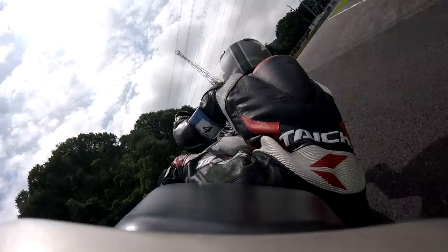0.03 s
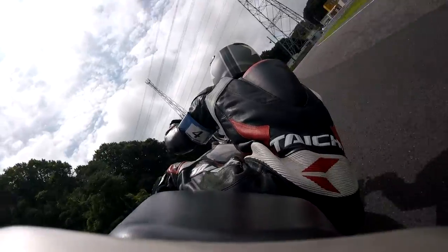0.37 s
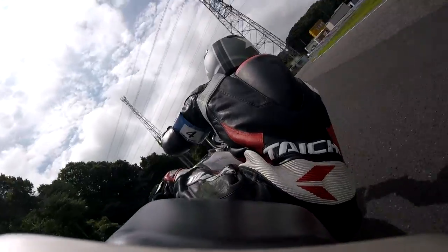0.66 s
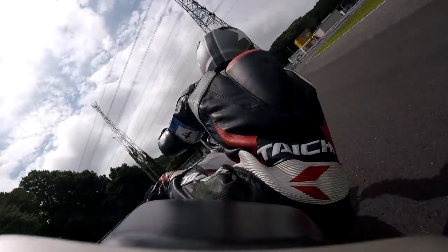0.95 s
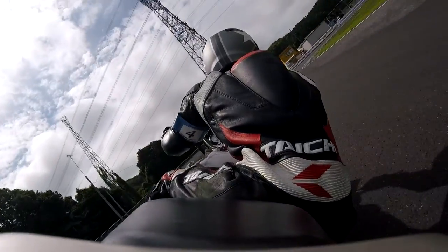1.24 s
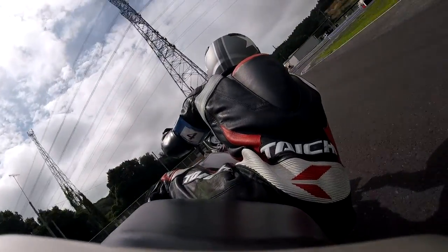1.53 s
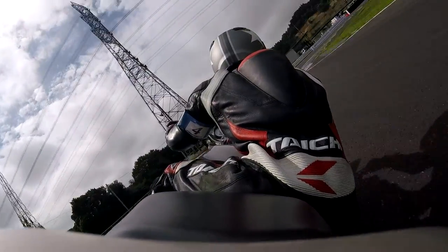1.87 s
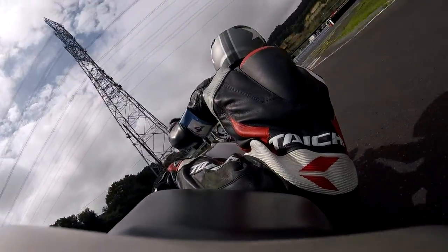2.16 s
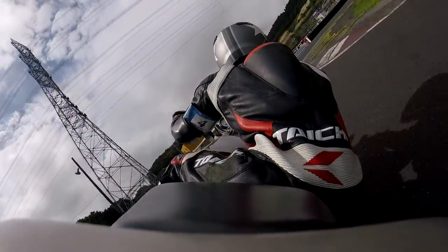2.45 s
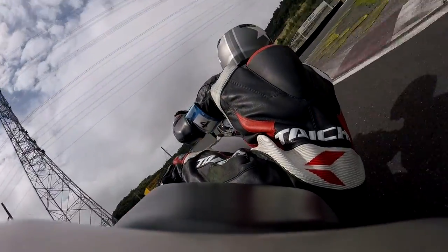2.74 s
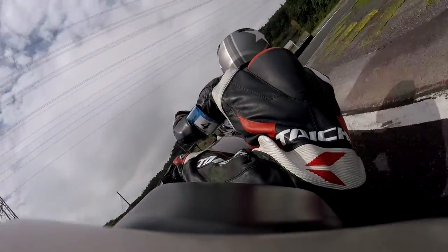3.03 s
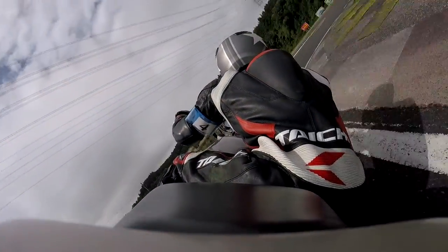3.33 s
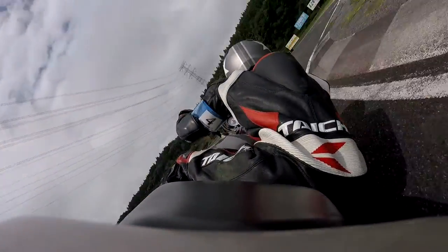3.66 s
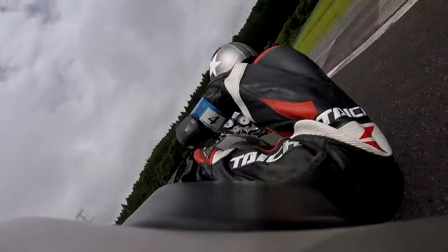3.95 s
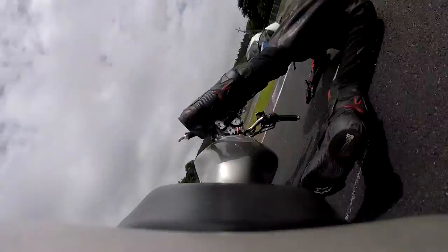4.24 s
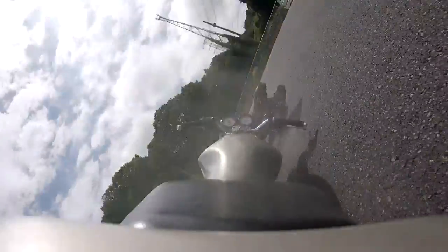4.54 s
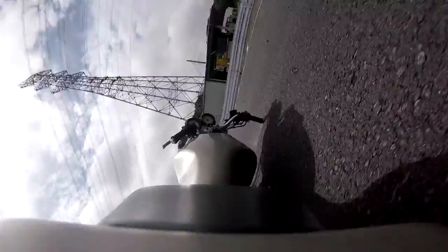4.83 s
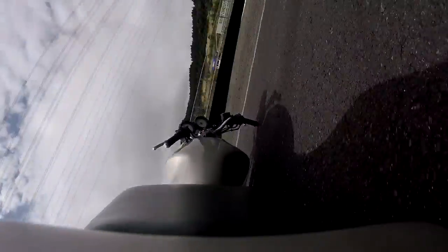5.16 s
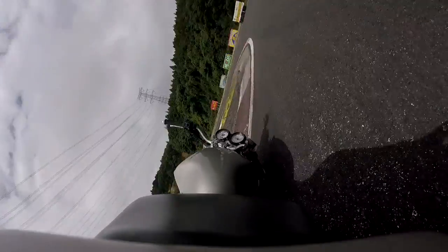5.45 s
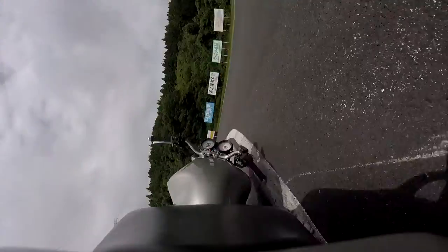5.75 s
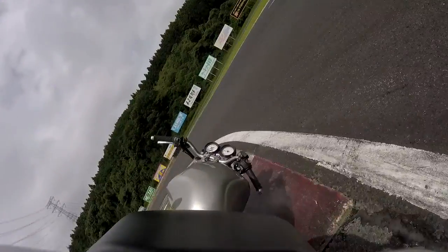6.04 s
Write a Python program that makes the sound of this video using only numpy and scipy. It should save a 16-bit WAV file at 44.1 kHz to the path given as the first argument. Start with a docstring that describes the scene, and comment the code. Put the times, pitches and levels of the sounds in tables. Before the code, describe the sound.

Heard from on board, a motorcycle drones through buffeting wind, falls, and grinds and bumps along the track as its engine dies.

```python
"""Racing motorcycle crashing in a bend

Heard from a case on its tail, a four-cylinder bike rolls off the throttle. Each firing cracks in the
exhaust, and the silencer booms as the revs fall, over wind and chassis roar. The revs rise, a footpeg
grazes the asphalt and the bike goes down. The engine dies while the bike grinds, judders and knocks
along the track, hits the kerb and slides on quietly."""
import sys
import numpy as np
from scipy import signal
from scipy.fft import rfft, irfft
from scipy.io import wavfile
from scipy.ndimage import uniform_filter1d, minimum_filter1d

SR = 44100
rng = np.random.default_rng(int(sys.argv[2]) if len(sys.argv) > 2 else 0)


def transcribe(signal):
    """Save signal, clipped to [-1, 1], as a 16-bit WAV file at the path in sys.argv[1]."""
    frames = np.atleast_2d(signal).T
    limited = np.clip(frames, -1, 1)
    pcm = np.round(limited * 32767).astype(np.int16)
    wavfile.write(sys.argv[1], SR, pcm)


N = 277389
TIME = np.arange(N) / SR
CRUISE_HZ = 330  # reference firing rate for the levels that follow the revs

# the four firings of a cycle: strength/dB, lateness/share of the firing gap
CYLINDERS = [(1.5, 0.0028), (2, 0.014), (0, -0.0046), (0.5, .005)]
# engine load, with the throttle snapped shut before the bend: t/s, level/dB
LOAD = [(0, 0), (.715, 2), (.745, -10), (.9, -1.5), (2.3, -0.5), (2.6, -10), (3.25, -6.5), (3.5, 5.5),
        (3.85, -4), (4.3, -4.5)]


def revs(flare_s=3.497, flare_length_s=.026, flare_hz=17):
    """Firings per second, with a brief flare as the rear tyre slips on the painted line."""
    firing_rate = [(0.0, 323.8), (0.22, 329), (0.35, 336), (0.52, 346.8), (0.64, 347.3), (0.725, 350),
                   (0.8, 319.5), (0.88, 327.8), (1.0, 326.3), (1.2, 317.7), (1.4, 305), (1.62, 288.3),
                   (1.85, 277), (2.0, 267.4), (2.35, 252.3), (2.9, 235.8), (3.42, 221), (3.66, 239),
                   (3.9, 263), (4.17, 301.5), (4.4, 266), (4.52, 222), (4.75, 180)]  # engine speed: t/s, f/Hz
    return curve(firing_rate) + flare_hz * np.exp(-((TIME - flare_s) / flare_length_s) ** 2)


def shaft():
    """The slightly unsteady shaft's position, counted in firings."""
    return np.cumsum(revs() * (1 + .0012 * wander(hz=32.4))) / SR


def running(stall_s=4.814, fade_s=0.53):
    """1 while the bike runs, fading to 0 as it stalls."""
    return 1 - ramp(stall_s - fade_s, fade_s)


def engine(firings, lope_db=-2, cycle_db=-11, whine_db=-74, casing_hz=6750, casing_width_hz=450):
    """Exhaust cracks, the low orders of silencer and crank, and gear whine, all on one shaft."""
    bark, crank, boom, octave, twelfth = engine_levels()
    cycle = firings / len(CYLINDERS)
    # the silencer's overtones throb once a cycle and flutter from firing to firing
    throb = unit(amp(wander(hz=91) - np.cos(2 * np.pi * cycle)))
    overtones = octave * tone(firings, order=2, waver_db=2.2)
    overtones += twelfth * tone(firings, order=3, waver_db=2.4)
    pipe = boom * tone(firings, order=1, waver_db=1.36) + throb * overtones
    # unequal cylinders add orders of the whole cycle, stronger under load
    lope = amp(lope_db) * tone(cycle, order=3, waver_db=4.0)
    lope += amp(cycle_db) * tone(cycle, order=1, waver_db=1.5)
    shake = crank * tone(cycle, order=2, waver_db=3.0) + bark ** 0.65 * lope
    # the gears sing only where their mesh rate meets a resonance of the casing
    mesh_hz = 30 * np.gradient(firings) * SR  # 30 teeth per firing
    casing = amp(whine_db) / (1 + ((mesh_hz - casing_hz) / casing_width_hz) ** 2)
    whine = casing * ringing(mesh_hz, width_hz=80)
    return exhaust(firings, bark) + pipe + shake + whine


def engine_levels(bark_db=-25, bark_db_per_hz=0.24, overtone_db_per_hz=0.19,
                  fall_s=3.9, fall_db=-4, dying_db_per_s=-13):
    """Gains of bark, crank shake, boom, octave and twelfth, shaped by revs, load and throttle."""
    crank = [(0, -11), (.3, -21), (.55, -11), (.72, -12), (.9, -16), (1.3, -23.5), (1.5, -15.5),
             (2.55, -26), (3.9, -22)]  # crank shake: t/s, level/dB
    throttle = [(0, 0.5, -5.5), (.74, -2, 2), (3.42, -7, -5.5)]  # voicing when open, shut, open again: from t/s, octave/dB, twelfth/dB
    hz, load_db = revs(), curve(LOAD)
    bark = amp(bark_db + bark_db_per_hz * (hz - CRUISE_HZ) + load_db)
    # as the bike goes down the silencer's note ducks, then dies away
    fallen = amp(fall_db * ramp(fall_s, 0.15) + dying_db_per_s * np.maximum(TIME - fall_s, 0))
    boom = fallen * amp(0.035 * load_db) * silencer(hz)
    since, *voicing_db = np.transpose(throttle)
    setting = np.searchsorted(since[1:], TIME)
    drive = fallen * amp(overtone_db_per_hz * (hz - CRUISE_HZ) + 0.17 * load_db)
    overtones = [drive * amp(uniform_filter1d(db[setting], size=1500)) * silencer(order * hz)
                 for order, db in enumerate(voicing_db, 2)]
    return running() * np.array([bark, amp(curve(crank)), boom, *overtones])


def exhaust(firings, bark, uneven_db=.5, rasp_db=-2, spit_db=7, overrun=1.2, jitter=.0024, puff=0.36):
    """A sharp crack and a puff of gas per firing; off the throttle the cylinders differ more."""
    pipe_eq = [(350, -39), (600, -20.5), (800, -5), (1050, -7.5), (1350, 1), (1700, -1.5), (2080, 2),
               (2400, 2), (2800, -10), (3400, -18), (4600, -28.5), (7000, -34), (9000, -55.5),
               (12000, -66.5)]  # colour of one crack: f/Hz, level/dB
    firing = np.arange(1, int(firings[-1]) - 1)
    strength_db, late = np.array(CYLINDERS)[firing % len(CYLINDERS)].T
    timing, size = rng.standard_normal((len(firing), 2)).T
    ragged = 1 + overrun / (1 + (np.interp(firing, firings, bark) / amp(-22.0)) ** 2)
    when = firing + ragged * late + jitter * timing  # jitter and puff are shares of the firing gap
    cracks = pulses(firings, when, amp(ragged * strength_db + uneven_db * size))
    # the gas hisses far above the cracks, and one cylinder spits hardest
    spit = amp(spit_db * (firings % len(CYLINDERS) < 1))
    puffs = spit * np.exp(-(firings % 1) / puff) * rng.standard_normal(N)
    hiss = np.diff(np.diff(puffs, prepend=0), prepend=0)
    return bark * unit(colour(cracks + amp(rasp_db) * unit(hiss), pipe_eq))


def silencer(hz):
    """Gain of an engine order as it sweeps through the silencer's resonances."""
    resonances = [(243.4, 34, -6), (312, 50, -15.5), (497, 16, -9.5), (546, 13, -19), (655, 30, -25.5),
                  (745, 14, -19), (826, 23, -23.5), (958, 36, -23)]  # f/Hz, half width/Hz, level/dB
    return sum(amp(db) / (1 + ((hz - centre) / width) ** 2) for centre, width, db in resonances)


def knocks(rise_s=.0045, rattle_db=-19, rattle_s=0.041, detune=0.043, debris_db=-6.5):
    """Each blow crushes plastic and grit for a moment and sets the tail unit ringing."""
    # blows to the bike: t/s, thud/dB, crunch/dB and grit/dB (both before debris_db), crush length/s
    blows = [(1.658, -20.5, -9, -55.5, 0.0036), (4.251, -5.5, -13, -43, 0.014),
             (4.309, -13, -7, -62, 0.017), (4.326, -4, -16, -50, 0.0091), (4.363, -24, -19, -34.5, 0.0065),
             (4.458, -4, -3, -36, 0.019), (4.505, -5, -13.5, -46.5, 0.021), (4.622, -12, -20, -71, .005),
             (4.735, -2.5, -19, -50, 0.026), (4.769, -6, -14, -46, 0.01), (4.864, -6, -7, -46, 0.011),
             (4.944, -10, -18, -48, 0.02), (5.134, -10.5, -19, -61, .006), (5.251, -20, -22, -58, .004),
             (5.371, -8, -24.5, -44.5, 0.01), (5.55, -15, -29, -57, 0.0041),
             (5.616, -1.5, -17, -49, 0.0042), (5.666, -5, -17, -44, 0.0074), (5.758, -4.5, -14, -54, 0.016),
             (5.795, -3, -1, -32.5, .008), (5.868, -11, -22, -58, .013), (5.968, -1.5, 3.5, -32, 0.0091),
             (5.979, -7, -12, -31.5, 0.0034)]
    modes = [(126.4, 2, 0.21), (193.5, 7, 0.092), (234.3, 8, 0.14), (275.6, -15, 0.39), (395.6, -8, .15),
             (651, -19.5, 0.24), (727, -10.5, 0.15), (970, -50, .2), (1260, -44.5, .2), (1560, -31, 0.13)]  # tail unit and case: f/Hz, level/dB, t60/s
    crunch_eq = [(150, 8), (450, 0), (650, 1.5), (900, 0), (1400, -7.5), (1900, -20), (3000, -31),
                 (4500, -41.5), (7000, -39.5), (9500, -46), (12000, -65.5)]  # crushed plastic: f/Hz, level/dB
    grit_eq = [(1500, -22.5), (3200, 12), (4500, 1), (6800, 6.5), (8400, -6.5), (9800, -10.5), (12000, -20)]  # bright chips of grit: f/Hz, level/dB
    thuds, crush, grit = np.zeros((3, N))
    hz, mode_db, t60 = np.transpose(modes)[:, :, None]
    t = np.arange(SR // 2) / SR
    decays = amp(mode_db) * np.exp(-np.log(1000) * t / t60)
    for s, thud_db, crunch_db, grit_db, length in blows:
        struck_hz = hz * (1 + detune * rng.standard_normal(hz.shape))
        ring = (decays * np.sin(2 * np.pi * struck_hz * t)).sum(0)
        ring *= 1 - np.exp(-(t / 0.0019) ** 2)  # the plastic gives, so the ring starts softly
        add(thuds, s, amp(thud_db) * ring / abs(ring).max())
        # the contact builds up, lets go, and loose parts rattle on
        before, after = np.maximum(s - TIME, 0), np.maximum(TIME - s, 0)
        rattle = amp(rattle_db) * np.exp(-after / rattle_s)
        force = np.exp(-before / rise_s) * (np.exp(-(after / length) ** 2 / 2) + rattle)
        crush += amp(crunch_db) * force
        grit += amp(grit_db) * force
    crunch = crush * unit(colour(grains(per_s=5000, spread_db=4.5), crunch_eq))
    chips = grit * unit(colour(grains(per_s=7000, spread_db=0.5), grit_eq))
    return thuds + amp(debris_db) * (crunch + chips)


def slide():
    """The frame rumbles and the asphalt grinds in uneven slips, hardest once the bike is down."""
    scrubs = [(3.22, .22, -18, -34), (3.5, 0.56, -23, -29.5)]  # tyres over kerb and painted line: t/s, hold/s, rumble/dB, grind/dB
    skids = [(4.076, 0.3, -16.5, -23), (4.448, 0.16, -11.5, -27), (4.702, 0.19, -12, -24.5),
             (4.924, 0.29, -17, -25), (5.275, .19, -16, -25.5), (5.57, .25, -12, -25.5),
             (5.865, .01, -27, -33.5)]  # on its side between bounces: t/s, hold/s, rumble/dB, grind/dB
    rumble_eq = [(12, -9.5), (25, -0.5), (55, 1), (100, 0.5), (170, -7), (230, -6.5), (310, -16.5),
                 (480, -34.5), (1200, -67)]  # the frame's low end: f/Hz, level/dB
    grind_eq = [(150, 2.5), (230, 6), (350, 0), (520, -7), (720, 2), (850, 3.5), (1000, -3), (1300, -10),
                (1800, -24.5), (2500, -27.5), (3800, -39), (7200, -38.5), (9000, -52.5), (12000, -64)]  # grinding asphalt: f/Hz, level/dB
    rumble, grind = strokes(scrubs + skids, attack_s=0.071, release_db_per_s=150)
    frame = unit(colour(rng.standard_normal(N), rumble_eq))
    slips = amp(1.52 * wander(hz=45))
    stones = unit(colour(grains(per_s=9800, spread_db=1.0) * slips, grind_eq))
    return rumble * frame + grind * stones


def judders():
    """Short bursts of stick and slip shake the whole frame."""
    bursts = [(4.442, 0.14, 229.6, 208, -11), (4.686, 0.078, 96, 77, -12), (4.841, 0.061, 70, 57.7, -7),
              (4.969, 0.22, 130, 105.2, -16), (5.108, 0.12, 67, 61.6, -10.5), (5.337, 0.097, 105, 114, -18),
              (5.445, 0.1, 67.6, 50.8, -7), (5.576, 0.084, 52.8, 64.6, -9)]  # low gliding shudders: t/s, length/s, start f/Hz, end f/Hz, level/dB
    out = np.zeros(N)
    for s, length, start_hz, end_hz, db in bursts:
        hz = np.linspace(start_hz, end_hz, int(length * SR))
        swell = amp(db) * signal.windows.tukey(len(hz), .7)
        add(out, s, swell * np.sin(2 * np.pi * np.cumsum(hz) / SR))
    return out


def footpeg(attack_s=0.043, release_db_per_s=470):
    """Metal chatters over the stones and squeals in short bursts."""
    scrapes = [(3.695, 0.029, -28), (4.055, 0.22, -24.5), (4.28, 0.085, -32.5), (4.46, 0.014, -35.5)]  # peg and fairing on the asphalt: t/s, hold/s, level/dB
    squeals = [(3.703, .008, -45), (4.11, .135, -36)]  # the peg sings out: t/s, hold/s, level/dB
    scrape_eq = [(400, -22), (850, 12.5), (1150, 0.5), (1500, 5), (1900, -4.5), (2800, -6.5), (3200, -4),
                 (3700, -13), (5200, -18), (7200, -31.5), (9000, -41), (12000, -56.5)]  # scraping metal: f/Hz, level/dB
    modes = [(3220, 41, -6.5), (4850, 90, -22)]  # the peg's resonances: f/Hz, width/Hz, level/dB
    chatter = grains(per_s=6500, spread_db=0.5) * amp(1.3 * wander(hz=70))
    rings = sum(amp(db) * ringing(hz, width_hz) for hz, width_hz, db in modes)
    scrape = strokes(scrapes, attack_s, release_db_per_s)[0] * unit(colour(chatter, scrape_eq))
    squeal = strokes(squeals, attack_s, release_db_per_s)[0] * unit(rings)
    return scrape + squeal


def groan():
    """A frame slider's rough note rises and sinks on the asphalt as the bike turns on its side."""
    contour = [(4.902, 745, -30), (5.021, 815.6, -32), (5.141, 866, -27.5), (5.279, 777, -41),
               (5.42, 753, -46), (5.52, 698, -42)]  # the slider's note: t/s, f/Hz, level/dB
    s, hz, db = np.transpose(contour)
    level = np.interp(TIME, s, amp(db), left=0, right=0)
    return level * ringing(np.interp(TIME, s, hz), width_hz=46)


def drag(start_s=6.0, bite_db=-29, creep_db=-37, settle_s=0.044):
    """After the last blow the bike creeps over the kerb with a dull, gritty rub."""
    rub_eq = [(15, -6), (50, 15.5), (90, 7.5), (220, 3.5), (330, -8.5), (700, -7), (1000, -23),
              (1300, -21.5), (1800, -36), (3000, -43), (5000, -58), (10000, -64)]  # slow rub on the kerb: f/Hz, level/dB
    settling = amp(bite_db) * np.exp(-np.maximum(TIME - start_s, 0) / settle_s)
    level = ramp(start_s - settle_s, settle_s) * (amp(creep_db) + settling)
    rub = grains(per_s=3400, spread_db=3.5) * amp(1.6 * wander(hz=45))
    return level * unit(colour(rub, rub_eq))


def wind():
    """Lumpy air buffets the case, weakest at the apex of the bend, and fades with the engine."""
    strength = [(0, -14.5), (.7, -12.5), (2.1, -15.5), (2.7, -22), (3.1, -23.5), (3.6, -17.5), (4.4, -20.5)]  # buffeting: t/s, level/dB
    buffet_eq = [(12, -13), (25, -4), (55, 2.5), (100, -6), (160, -1), (250, 2.5), (320, -11.5), (420, -14),
                 (560, -28.5), (1200, -60)]  # wind on the case: f/Hz, level/dB
    buffet = colour(rng.standard_normal(N), buffet_eq) * amp(0.5 * wander(hz=36))
    return running() * amp(curve(strength)) * unit(buffet)


def chassis(firings, roar_db=-25.7, roar_db_per_hz=.075, load_share=.25, buzz_db=-1, scatter_s=0.025):
    """Coarse asphalt and one jolt per engine cycle set the chassis roaring, more with revs and load."""
    roar_eq = [(250, -17.5), (420, -5.5), (600, -4), (860, 2), (1150, -5), (1450, -10), (1750, -17.5),
               (2350, -21), (2900, -25.5), (3800, -28.5), (5000, -35.5), (7200, -40), (9000, -52),
               (12000, -65)]  # colour of the chassis: f/Hz, level/dB
    cycles = np.arange(1, int(firings[-1]) - 1, len(CYLINDERS))
    jolts = pulses(firings, cycles, amp(rng.standard_normal(len(cycles))))
    # each jolt scatters through the bodywork
    t = TIME[:SR // 20]
    scatter = rng.standard_normal(len(t)) * np.exp(-t / scatter_s)
    buzz = unit(signal.oaconvolve(jolts, scatter)[:N])
    road = grains(per_s=9000, spread_db=2.5) * amp(0.9 * wander(hz=34.8))
    level_db = roar_db + roar_db_per_hz * (revs() - CRUISE_HZ) + load_share * curve(LOAD)
    return running() * amp(level_db) * unit(colour(road + amp(buzz_db) * buzz, roar_eq))


def tone(position, order, waver_db):
    """One engine order whose strength wavers."""
    return np.sqrt(2) * np.cos(2 * np.pi * order * position) * amp(waver_db * wander(hz=20.7))


def pulses(firings, when, size):
    """Sharp band-limited pulses at the given shaft positions."""
    place = np.interp(when, firings, np.arange(N))
    near = place.astype(int)[:, None] + np.arange(-8, 9)
    shapes = size[:, None] * np.sinc(near - place[:, None])
    return unit(np.bincount(np.clip(near, 0, N - 1).ravel(), shapes.ravel(), N))


def ringing(hz, width_hz):
    """A narrow resonance kept going by random rubbing."""
    phase = 2 * np.pi * np.cumsum(hz * np.ones(N)) / SR
    return unit(wander(width_hz) * np.cos(phase) + wander(width_hz) * np.sin(phase))


def grains(per_s, spread_db):
    """Tiny impacts on stones, a few of them large."""
    size = amp(spread_db * np.minimum(rng.exponential(1, N), 4))
    return unit(size * rng.choice([-1, 1], N) * (rng.random(N) < per_s / SR))


def strokes(rows, attack_s, release_db_per_s):
    """Each rubbing contact bites, holds and lets go; one envelope per dB column."""
    gains = []
    for s, hold, *db in rows:
        release = amp(-release_db_per_s * np.maximum(TIME - s - hold, 0))
        gains.append(amp(db)[:, None] * ramp(s - attack_s, attack_s) * release)
    return np.max(gains, axis=0)


def colour(x, points):
    """Minimum-phase EQ through (f/Hz, level/dB) points, falling 20 dB an octave above the last."""
    hz, db = np.transpose(points)
    grid = np.maximum(abs(np.fft.fftfreq(8192, 1 / SR)), 1)
    octaves_above = np.maximum(np.log2(grid / hz[-1]), 0)
    log_gain = np.log(amp(np.interp(np.log(grid), np.log(hz), db) - 20 * octaves_above))
    taps = np.fft.ifft(np.exp(signal.hilbert(log_gain).conj())).real[:4096]
    return signal.oaconvolve(x, taps)[:len(x)]


def wander(hz):
    """Smooth random drift of rms 1, rolling off above the given rate."""
    spectrum = rfft(rng.standard_normal(N))
    return unit(irfft(spectrum / (1 + (np.fft.rfftfreq(N, 1 / SR) / hz) ** 4), N))


def curve(points):
    """Joins (t/s, value) points by straight lines."""
    return np.interp(TIME, *np.transpose(points))


def ramp(start_s, length_s):
    """Rises from 0 to 1."""
    return np.clip((TIME - start_s) / length_s, 0, 1)


def add(mix, s, sound):
    """Mixes a sound in at a time."""
    part = mix[max(round(s * SR), 0):][:len(sound)]
    part += sound[:len(part)]


def amp(db):
    """Decibels to gain."""
    return 10 ** (np.asarray(db) / 20)


def unit(x):
    """Scales to rms 1."""
    return x / np.sqrt(np.mean(x ** 2) + 1e-20)


def scene():
    """Engine, crash, wind and chassis meet at one point on the bike, in open air."""
    firings = shaft()
    crash = footpeg() + slide() + groan() + judders() + knocks() + drag()
    return (engine(firings) + crash + wind() + chassis(firings))[None]


def record(dry, ceiling=0.87, fade_in_s=.004, cutoff_hz=11800):
    """A fast peak limiter, a soft start, then a steep low-pass."""
    needed = np.minimum(1, ceiling / (abs(dry).max(0) + 1e-9))
    held = minimum_filter1d(needed, size=300)
    gain = uniform_filter1d(uniform_filter1d(held, size=150), size=150) * ramp(0, fade_in_s)
    lowpass = signal.firwin(511, cutoff_hz, window=("kaiser", 9), fs=SR)
    return signal.oaconvolve(dry * gain, lowpass[None], "same")


dry = scene()
out = record(dry)
transcribe(out)
```